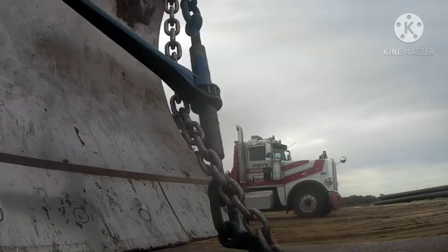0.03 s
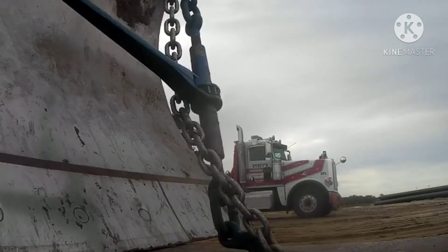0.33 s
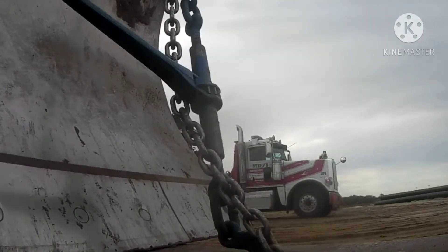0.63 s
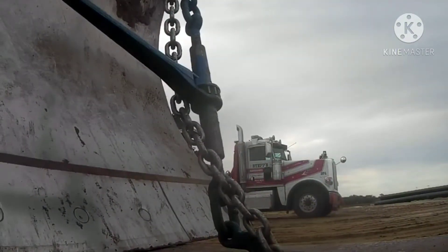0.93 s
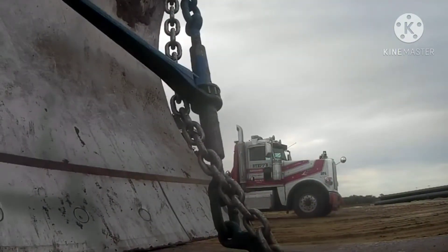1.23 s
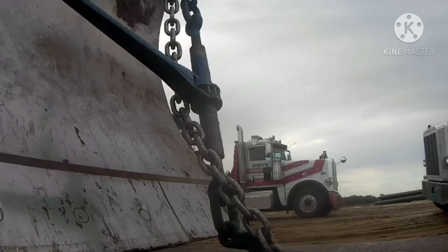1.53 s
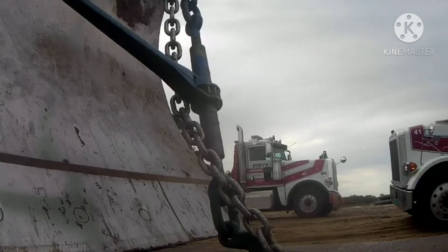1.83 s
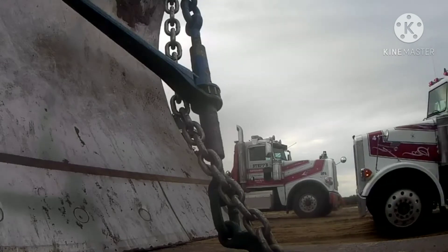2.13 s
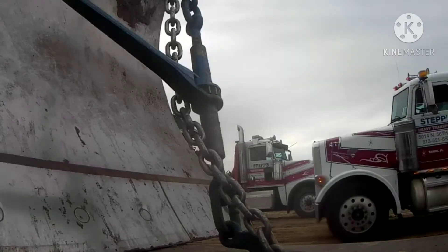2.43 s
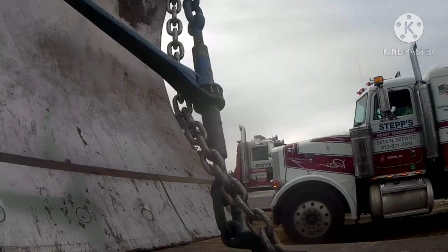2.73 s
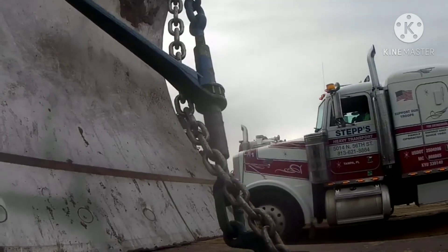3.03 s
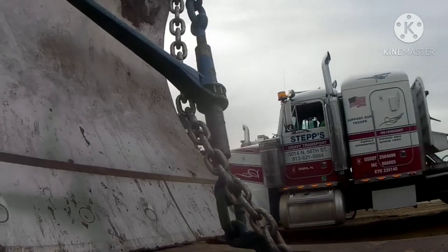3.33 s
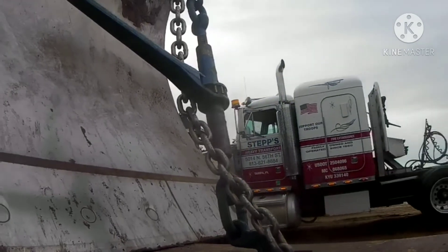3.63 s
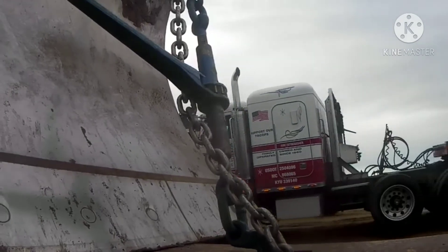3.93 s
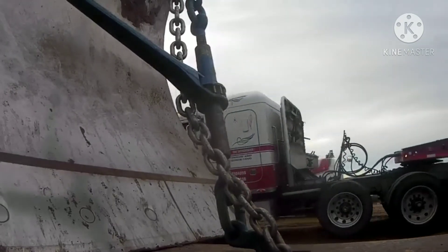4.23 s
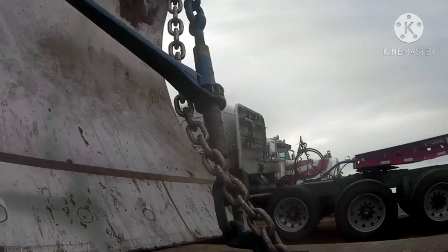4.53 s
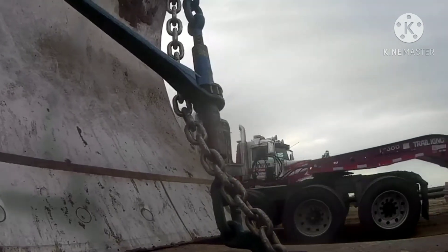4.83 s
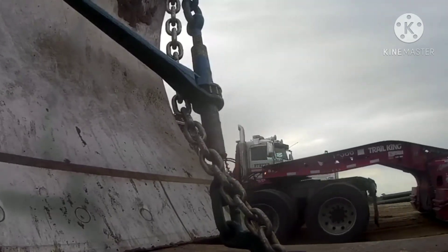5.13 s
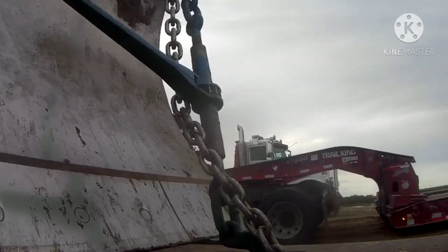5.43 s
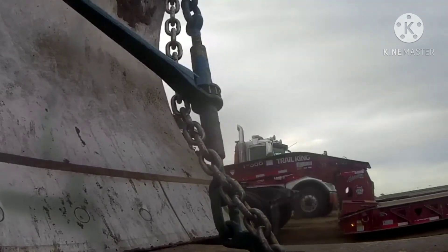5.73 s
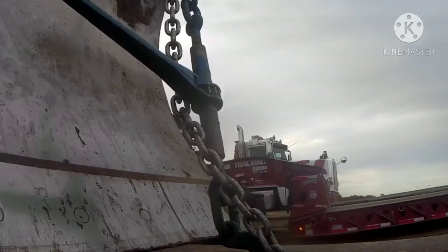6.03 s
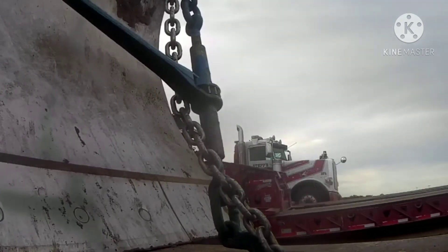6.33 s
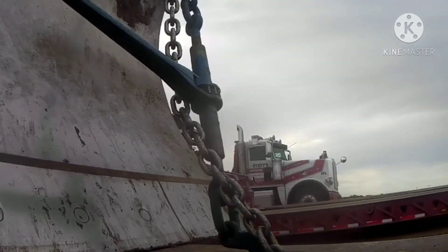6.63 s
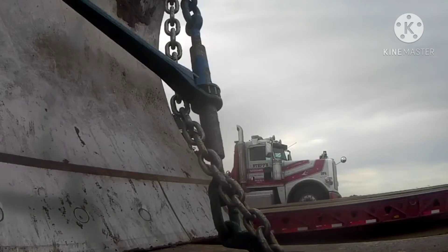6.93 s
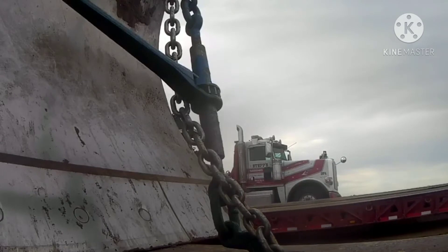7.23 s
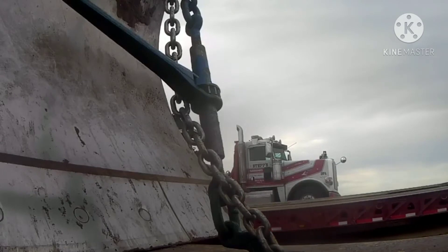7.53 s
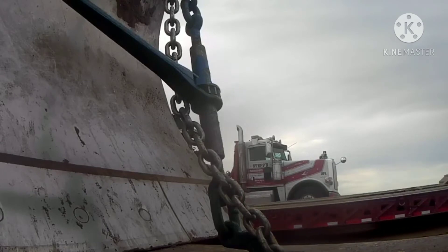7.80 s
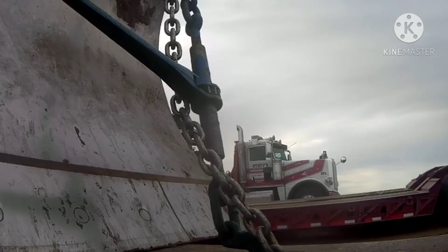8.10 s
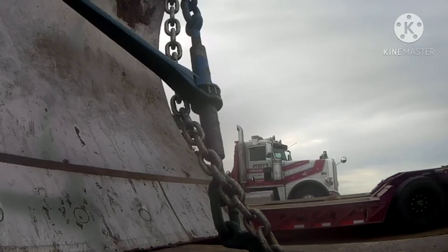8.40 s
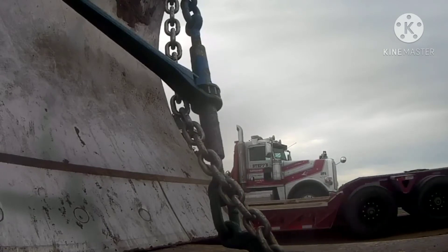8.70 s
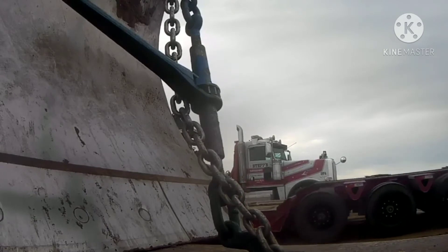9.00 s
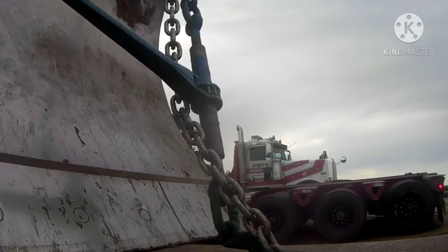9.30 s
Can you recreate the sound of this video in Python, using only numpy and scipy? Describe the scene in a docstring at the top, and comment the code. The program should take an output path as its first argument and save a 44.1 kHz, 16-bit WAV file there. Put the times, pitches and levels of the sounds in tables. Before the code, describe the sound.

Over a low, throbbing engine drone, a diesel truck rolls slowly by, loose metal rattling hard, followed by scattered trailer clanks.

```python
"""A standing engine drones and throbs while a heavy diesel truck crawls closer over a dirt lot.
We listen from beside a chained load. The truck's motor puffs, knocks and whines, its tyres grind
the dirt, and loose steel rattles hard as it draws level. Then the motor fades behind the load,
its low trailer clanks over the ruts and chain links clink. The drone goes on throughout."""
import sys
import numpy as np
from scipy import signal
from scipy.fft import rfft, irfft, next_fast_len
from scipy.io import wavfile
from scipy.ndimage import uniform_filter1d

SR = 44100
rng = np.random.default_rng(int(sys.argv[2]) if len(sys.argv) > 2 else 0)


def int16_out(signal):
    """Quantize to a 16-bit WAV file."""
    q = np.round(np.clip(np.atleast_2d(signal).T, -1, 1) * 32767)
    wavfile.write(sys.argv[1], SR, q.astype(np.int16))


N = 412776
TIME = np.arange(N) / SR


def from_db(db):
    """Turn decibels into a factor to multiply by."""
    return 10 ** (np.asarray(db) / 20)


def rms_one(x):
    """Scale a sound so that its average strength (rms) is 1."""
    return x / np.sqrt(np.mean(x ** 2) + 1e-20)


def in_time(rows):
    """Join a table's timed points into one curve per column, with rounded corners."""
    s, *columns = np.transpose(rows)
    return [uniform_filter1d(np.interp(TIME, s, c), size=SR // 50, mode="nearest") for c in columns]


def bumps(rows):
    """Smooth swells and dips, in dB."""
    return sum(db * np.exp(-((TIME - s) / half_s) ** 2) for s, db, half_s in rows)


def drift(rate_hz):
    """A random wander of typical size 1; a higher rate wanders faster."""
    r = np.exp(-80 * np.pi * rate_hz / SR)
    slow = signal.lfilter([1], [1, -2 * r, r * r], rng.standard_normal(N // 40 + 2002))[2000:]
    return np.interp(np.arange(N) / 40, np.arange(len(slow)), rms_one(slow))


def coloured_noise(spectrum, flutter=1):
    """Noise, made to flutter if asked, then shaped to the given spectrum; rms 1."""
    hz, db = np.transpose(spectrum)
    size = next_fast_len(N)
    bins = np.maximum(np.fft.rfftfreq(size, 1 / SR), 1)
    gain = from_db(np.interp(np.log(bins), np.log(hz), db))
    noise = flutter * rng.standard_normal(N)
    return rms_one(irfft(rfft(noise, size) * gain, size)[:N])


def wavering(hz, width_hz):
    """A narrow band of noise around a moving pitch."""
    phase = 2 * np.pi * np.cumsum(hz) / SR
    return drift(width_hz) * np.sin(phase) + drift(width_hz) * np.cos(phase)


def resonance(x, hz, width_hz):
    """Let through only the sound near one pitch."""
    r = np.exp(-np.pi * width_hz / SR)
    feedback = [1, -2 * r * np.cos(2 * np.pi * hz / SR), r * r]
    return signal.lfilter(np.array([1, 0, -1]) * (1 - r * r) / 2, feedback, x)


def ring(x, hz, ring_s):
    """Each click starts a tone that fades by 60 dB in ring_s."""
    r, w = from_db(-60 / (ring_s * SR)), 2 * np.pi * hz / SR
    return signal.lfilter([0, np.sin(w)], [1, -2 * r * np.cos(w), r * r], x + 1e-18)


def shaken(force, resonances):
    """A body sounds at its resonances when shaken at random with the given strength."""
    out = 0
    for hz, width_hz, db in resonances:
        shake = force * (rng.random(N) - .5) + 1e-18
        band = resonance(shake, hz, 1.5 * width_hz)
        out = out + from_db(db) * resonance(band, hz, 1.5 * width_hz)  # twice, for steep sides
    return rms_one(out) * np.sqrt(np.mean(force ** 2))


def dying(clicks, decay_s):
    """Each click becomes a jump in level that dies away."""
    return signal.lfilter([1], [1, -np.exp(-1 / (decay_s * SR))], clicks + 1e-18)


def hidden(from_s=2.4, takes_s=2.2):
    """How far the load has come between motor and listener, from 0 to 1."""
    return np.clip((TIME - from_s) / takes_s, 0, 1)


def passing(nearest_s, level_db, shadow_db, spread_db, gap_m=3.4, speed_m_per_s=2.67):
    """Gain of a passing part: it loses spread_db per tenfold distance and shadow_db behind the load."""
    distance_m = np.hypot(gap_m, speed_m_per_s * (TIME - nearest_s))
    return from_db(level_db - spread_db * np.log10(distance_m / gap_m) - shadow_db * hidden())


def screened(loss_db, from_s=0.52, takes_s=1.0):
    """Gain of a forward-facing part, quieter until the truck's nose swings into the open."""
    return from_db(-loss_db * np.clip(1 - (TIME - from_s) / takes_s, 0, 1))


def standing_engine(turns_hz=30.004):
    """An engine at steady speed booms at four times its turning rate; nearby tones make it throb."""
    # The boom's slow rise and fall. Each row: time in seconds, level in dB.
    boom_levels = [(0, -33), (1.15, -39), (1.7, -35.5), (2.0, -36.5), (2.55, -33), (3.0, -35.5),
                   (3.65, -47), (3.95, -37), (4.3, -40.5), (6.3, -40.5), (7.3, -39.5), (9.0, -44.5),
                   (9.36, -40)]
    # Its brief swells and dips. Each row: time in seconds, change in dB, half length in seconds.
    swells = [(0.394, -6, .04), (0.546, 3.5, 0.044), (1.948, -5, .05), (2.9, 4, 0.026), (2.98, -6, 0.037),
              (4.065, 5.5, 0.033), (5.743, 12, .018), (6.27, -8, .07), (7.373, 8, 0.048),
              (7.794, -4, 0.069), (7.995, 9, 0.034)]
    # Tones beside the boom. Each row: pitch in Hz, relative level in dB, first throb in seconds.
    throb_tones = [(123.78, -12, .008), (111.39, -15.5, .094), (115, -18.5, .128), (105, -19, .063)]
    # The engine's weaker tones. Each row: multiple of the turning rate, level in dB.
    hum_tones = [(1, -57), (2, -58.5), (3, -60), (5, -55.5), (7, -63.5), (8, -61), (22, -67), (25, -67)]
    level_db, = in_time(boom_levels)
    boom_hz = 4 * turns_hz
    cycles = boom_hz * TIME + 0.075 * drift(5.3)
    boom = from_db(0.72 + bumps(swells) + 1.7 * drift(25)) * np.sin(2 * np.pi * cycles)
    throbs = sum(from_db(db) * np.sin(2 * np.pi * (cycles + (hz - boom_hz) * (TIME - s)))
                 for hz, db, s in throb_tones)
    hum = sum(from_db(db + 1.5 * drift(3)) * np.sin(2 * np.pi * (k * turns_hz * TIME + rng.random()))
              for k, db in hum_tones)
    return np.sqrt(2) * (from_db(level_db) * (boom + throbs) + hum)


def exhaust(firings):
    """Each firing puffs from the pipe; the puffs blend into tones that change as the cab goes by."""
    # Each row: multiple of the firing rate, level from the front in dB, level from behind in dB.
    tones = [(1, -14, -36), (2, -19, -12.5), (3, -15, -12), (4, -25, -19.5), (6, -10.5, -18.5),
             (9, -16, -20.5), (12, -15, -20.5), (13, -7, -26), (14, -38, -16.5), (16, -27, -23)]
    behind = hidden()
    out = 0
    for multiple, front_db, back_db in tones:
        gain = from_db(front_db + behind * (back_db - front_db) + 4.3 * drift(2.7))
        cycles = multiple * (firings + 0.0048 * drift(5.2)) + rng.random()
        out = out + gain * np.sin(2 * np.pi * cycles)
    return passing(nearest_s=4, level_db=-41.5, shadow_db=2.5, spread_db=16) * np.sqrt(2) * out


def cylinder_knock(firings):
    """A pulsing gain from six cylinders of uneven loudness; it smears once the motor has passed."""
    cylinder_db = np.array([1.5, -5, -4, -1.0, -4, -7.5])
    strength = from_db(cylinder_db[firings.astype(int) % 6] + 3.2 * np.tanh(drift(44)))
    pulses = rms_one(strength * np.exp(-(firings % 1) / 1.14))
    depth = .3 - .1 * hidden()
    return (1 + depth * (pulses - pulses.mean())) * from_db(1.08 * np.tanh(drift(6.6)))


def rumble():
    """The moving truck makes a deep, even noise."""
    # Each row: frequency in Hz, relative level in dB.
    spectrum = [(25, -19), (45, -18), (70, -8.5), (100, -1.5), (130, 3.5), (165, -1.5), (240, -0.5),
                (320, -6), (420, -9), (600, -19.5), (900, -30), (2000, -48)]
    return passing(nearest_s=2, level_db=-41.5, shadow_db=-1, spread_db=12.5) * coloured_noise(spectrum)


def fan_roar(knock):
    """The fan's rush of air pulses with the cylinders."""
    # Each row: frequency in Hz, relative level in dB.
    spectrum = [(250, -1), (350, -7), (470, 2.5), (640, 5), (760, 3), (900, 5.5), (1080, -5), (1400, -17),
                (2000, -32), (4000, -42)]
    gain = passing(nearest_s=3.5, level_db=-42.5, shadow_db=5.5, spread_db=17.5)
    return gain * coloured_noise(spectrum, flutter=knock)


def growl(knock, start_hz=768, rise_hz_per_s=84, top_hz=976):
    """A rough, narrow band of the truck's roar rises in pitch, then fades behind the load."""
    hz = np.minimum(start_hz + rise_hz_per_s * TIME, top_hz)
    gain = passing(nearest_s=1, level_db=-49, shadow_db=27, spread_db=-13)
    return gain * knock * wavering(hz, width_hz=130)


def casing_clatter(knock):
    """The firings knock on the motor's casing and make it ring."""
    # Each row: pitch in Hz, width in Hz, level from the front in dB, level from behind in dB.
    casing = [(1113, 207, -5, -2), (1252, 121, 4, 0), (1418, 14, -1, -1.5), (1853, 360, -12.5, -15),
              (2242, 96, -8.5, -10.5), (2514, 380, -18, -22)]
    behind = hidden()
    force = passing(nearest_s=3.5, level_db=-41, shadow_db=3, spread_db=19) * screened(3.5) * knock
    front = shaken(force * np.sqrt(1 - behind), [(hz, width, db) for hz, width, db, _ in casing])
    back = shaken(force * np.sqrt(behind), [(hz, width, db) for hz, width, _, db in casing])
    return front + back


def injector_rasp(knock):
    """The fuel injectors add a high rasp in step with the firings."""
    # Each row: pitch in Hz, width in Hz, relative level in dB.
    resonances = [(3172, 180, 2), (3347, 160, 4)]
    gain = passing(nearest_s=3.5, level_db=-57, shadow_db=11, spread_db=8)
    return shaken(gain * screened(6.5) * knock, resonances)


def gear_whine(firing_hz, peak_s=4.2, peak_db=-59.5, rise_db_per_s=20, fall_db_per_s=10.5):
    """The gears whine in step with the motor, loudest as the drive axles go by."""
    since = TIME - peak_s
    level_db = peak_db + np.minimum(rise_db_per_s * since, -fall_db_per_s * since)
    return from_db(level_db) * wavering(36.8 * firing_hz, width_hz=28)


def passing_truck():
    """The diesel slowly speeds up, and its firings set the pace for its parts."""
    # The motor's speed. Each row: time in seconds, firings per second.
    speed = [(0, 57.6), (.6, 56.9), (1.6, 57.3), (2.8, 59), (4.1, 61.8), (4.7, 62.3), (5.2, 63.3),
             (7.3, 63.8), (9.36, 65.3)]
    # The low sounds dip as the nose comes into view.
    # Each row: time in seconds, change in dB, half length in seconds.
    dips = [(1.78, -5, 0.51)]
    firing_hz, = in_time(speed)
    firings = np.cumsum(firing_hz * (1 + 0.0018 * drift(3.05))) / SR  # a running count
    puffs = exhaust(firings)
    knock = cylinder_knock(firings)
    low = from_db(bumps(dips)) * (rumble() + puffs)
    motor = low + fan_roar(knock) + growl(knock) + casing_clatter(knock) + injector_rasp(knock)
    return motor + gear_whine(firing_hz)


def trailer_clanks(knock=0.64, scuff=0.79, frame_db=-3.0, contact_hz=3200, buzz_db=-21.0, buzz_s=0.054):
    """Each rut gives the frame a dull knock and a short scuff; it rings, and loose parts buzz."""
    # Each row: start in seconds, strength in dB, brightness in dB per octave, scuff time in seconds.
    clanks = [(0.053, -34, 4, 0.014), (5.723, -32.5, 5, .03), (5.752, -40, 0, 0.045),
              (5.79, -41, -16.5, 0.032), (5.905, -45, 13, 0.017), (6.489, -49.5, 21, 0.018),
              (6.89, -51, 22, .03), (6.996, -41.5, 10, 0.022), (7.41, -34.5, 9.5, 0.028),
              (7.446, -38, -4, 0.0091), (7.765, -45.5, 17, .035), (8.249, -49, 19, .03),
              (8.650, -31.5, 8, 0.005), (8.656, -22.5, -7.5, 0.033), (9.239, -37, 3, 0.059)]
    # The frame's own tones. Each row: pitch in Hz, relative level in dB, ring time in seconds.
    frame_tones = [(581, -18.5, 0.39), (627, -23.5, 0.14), (660, -19, 0.11), (1192, -4, 0.12),
                   (1245, -5, 0.13), (1254, -1, 0.12), (1460, -23, 0.14), (1434, -10.5, 0.11),
                   (1700, -27, 0.14), (2014, -21, 0.13), (2176, -16, 0.088), (2440, -25, 0.077),
                   (2557, -25.5, 0.092), (2800, -29, .12)]
    # The buzzing parts. Each row: pitch in Hz, width in Hz, relative level in dB.
    loose_parts = [(1210, 350, 2.5), (1960, 330, 0.5), (2500, 270, -11), (3320, 300, -10.5)]
    ringing, jolts = np.zeros(N), np.zeros(N)
    age = np.arange(SR // 6) / SR
    for hz, tone_db, ring_s in frame_tones:
        force = np.zeros(N + len(age))
        for s, db, bright_db, scuff_s in clanks:
            fade = np.exp(-age / scuff_s) * np.sqrt(2 / (scuff_s * SR))
            push = scuff * rng.standard_normal(len(age)) * fade
            push[0] = knock * np.sign(rng.standard_normal())
            start = round(s * SR)
            force[start:start + len(age)] += push * from_db(db + tone_db + bright_db * np.log2(hz / 1270))
            jolts[start] = from_db(db + buzz_db + bright_db / 2)
        # the soft contact feeds each tone only near its own pitch
        ringing += ring(resonance(force[:N], hz, hz / 4), hz, ring_s)
    soften = signal.butter(4, contact_hz, fs=SR, output="sos")
    frame = from_db(frame_db) * signal.sosfilt(soften, ringing)
    return frame + shaken(dying(jolts, buzz_s), loose_parts)


def tyres(grain_db=1.5):
    """The tyres grind the dirt in a slow surge as each set of axles rolls by."""
    # Each row: time in seconds, level in dB, half length in seconds.
    axles = [(2.658, -44, 0.34), (3.8, -44, .45), (5.75, -47.5, 0.25), (9.3, -56.5, .3)]
    # The grinding noise. Each row: frequency in Hz, relative level in dB.
    spectrum = [(100, -20), (190, -1.5), (280, 4.5), (440, -2), (570, -4), (750, -6), (1050, -3.5),
                (1500, -24), (4000, -45)]
    surges = sum(from_db(db) * np.exp(-((TIME - s) / half_s) ** 2) for s, db, half_s in axles)
    return surges * from_db(grain_db * drift(25)) * coloured_noise(spectrum)


def rattling_steel(clack_hz=1190, contact_s=0.0041, chatter_s=0.021, tail_s=0.078, light_per_s=4):
    """Loose steel strikes with a short clack and a rebound, then chatters as it settles."""
    # Each row: start in seconds, hardness in dB, chatter strength in dB.
    hard_blows = [(2.494, -20.5, -43.5), (2.569, -18.5, -40.5), (2.611, -17.5, -35), (2.647, -15.5, -37.5),
                  (2.7, -16, -33.5), (2.774, -13.5, -32), (2.788, -15, -36), (2.818, -11.5, -29),
                  (2.864, -17, -30.5), (2.925, -15.5, -32), (2.966, -19, -35), (2.987, -10, -28.5),
                  (2.998, -15, -42), (3.037, -15, -34), (3.078, -15, -29), (3.093, -10.5, -32),
                  (3.112, -8, -35), (3.124, -10.5, -28.5), (3.137, -12, -31.5), (3.18, -13, -28.5),
                  (3.246, -12, -30), (3.31, -8.5, -29), (3.412, -9.5, -33), (3.466, -12.5, -31),
                  (3.511, -10, -28), (3.599, -10, -30), (3.621, -14, -33), (3.662, -7.5, -26),
                  (3.704, -9.5, -28.5), (3.733, -25, -36), (3.765, -8, -29.5), (3.837, -13, -31.5)]
    # How hard the steel is shaken. Each row: time in seconds, level in dB, relative sizzle in dB.
    shaking = [(2.4, -60, -39), (2.6, -40, -39), (3.15, -36, -30.5), (3.38, -39, -38), (3.72, -29.5, -34),
               (3.86, -32, -36), (3.95, -73, -42), (4.1, -88, -40)]
    # The steel's resonances. Each row: pitch in Hz, width in Hz, relative level in dB.
    steel = [(460, 117, -16.5), (609, 34, -10.5), (826, 49, -0.5), (943, 117, -8), (1164, 76, 0),
             (1241, 14, 2), (1419, 44, -6.5), (1512, 36, -9.5), (1700, 250, -18), (2004, 31, -9),
             (2154, 307, -15.5), (2720, 45, -18), (2995, 130, -24.5), (3220, 58, -15), (3345, 110, -19.5),
             (3670, 72, -28.5)]
    # Its high, sizzling resonances, with the same columns.
    high_steel = [(3830, 650, 6), (4830, 820, 4.5), (6080, 460, 3)]
    shaking_db, sizzle_db = in_time(shaking)
    # light blows fall at random between the hard ones
    is_shaking = (TIME > shaking[0][0]) & (TIME < shaking[-1][0])
    light_starts = np.flatnonzero((rng.random(N) < light_per_s / SR) & is_shaking)
    blows = list(hard_blows) + [(i / SR, shaking_db[i] + 11, shaking_db[i]) for i in light_starts]
    hardest_db = max(row[1] for row in hard_blows)
    age = np.arange(SR // 40) / SR
    clacks, jolts = np.zeros(N), np.zeros(N)
    variations = rng.uniform(-1, 1, (200, 4))
    for (s, hard_db, chatter_db), (detune, length, late, phase) in zip(blows, variations):
        start = round(s * SR)
        contact = age / (contact_s * (1 + .15 * length))
        swell = contact * np.exp((1 - contact ** 3) / 3)
        rebound = .3 * np.exp(-((age - .011 - .002 * late) / .002) ** 2)
        tone = np.sin(2 * np.pi * clack_hz * (1 + 0.039 * detune) * age + np.pi * phase)
        clack_db = -11.5 - 1.18 * (hardest_db - hard_db)  # soft blows hardly clack
        clacks[start:start + len(age)] += from_db(clack_db) * (swell + rebound) * tone
        jolts[start] += from_db(chatter_db)
    chatter_power = dying((from_db(7) * jolts) ** 2, chatter_s / 2)
    tail_power = dying((from_db(-1) * jolts) ** 2, tail_s / 2)
    # the chatter takes a few milliseconds to build up; between blows the steel keeps shivering
    power = dying(chatter_power + tail_power, .004) / (.004 * SR) + from_db(shaking_db) ** 2
    force = np.sqrt(power) * from_db(1.3 * drift(120))
    sizzle = shaken(force * from_db(sizzle_db), high_steel)
    return clacks + shaken(force, steel) + sizzle


def chain_clinks(ring_s=0.16, gain_db=-9.5):
    """A chain link taps its neighbour and rings briefly."""
    # Each row: start in seconds, tap strength in dB, pitch in Hz.
    clinks = [(5.735, -34, 2140), (5.757, -50, 2140), (5.835, -51, 2210), (5.97, -40, 2260),
              (6.005, -41, 2250), (6.03, -52, 2350), (8.19, -43.5, 2320)]
    out = np.zeros(N)
    for s, db, hz in clinks:
        tap = np.zeros(N)
        tap[round(s * SR)] = from_db(db + gain_db)
        out += ring(resonance(tap + 1e-18, hz, hz / 8), hz, ring_s)
    return out


def scene():
    """Both engines, the tyres, the steel, the trailer and the chain in the open air, on one channel."""
    engines = standing_engine() + passing_truck()
    return (engines + tyres() + rattling_steel() + trailer_clanks() + chain_clinks())[None]


def record(dry, hiss_db=-62.0, cutoff_hz=15550):
    """The microphone adds an even hiss, and the highest treble is cut."""
    # The hiss. Each row: frequency in Hz, relative level in dB.
    spectrum = [(100, 0), (3000, 1), (6000, -2), (10000, -0.89), (13000, -1.6), (16000, -1.7)]
    hiss = from_db(hiss_db) * coloured_noise(spectrum)
    return signal.sosfilt(signal.ellip(12, .1, 80, cutoff_hz, fs=SR, output="sos"), dry + hiss)


dry = scene()
out = record(dry)
int16_out(out)
```